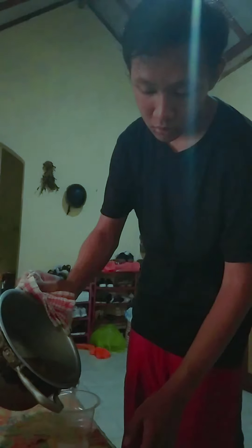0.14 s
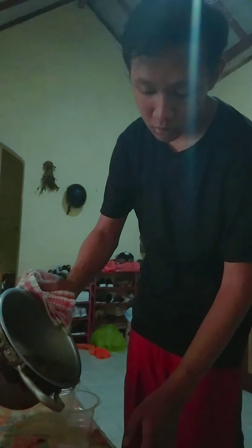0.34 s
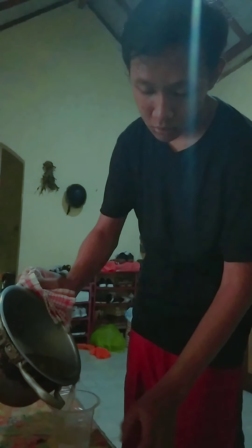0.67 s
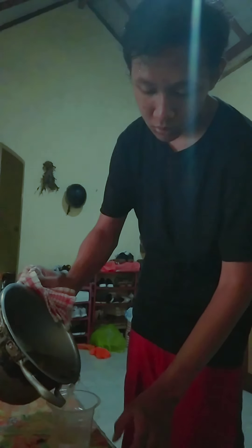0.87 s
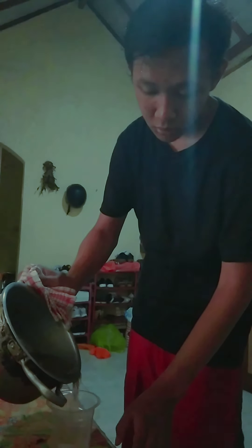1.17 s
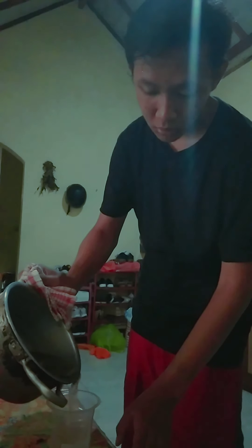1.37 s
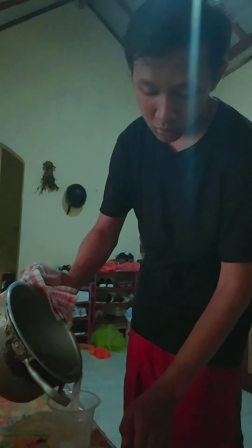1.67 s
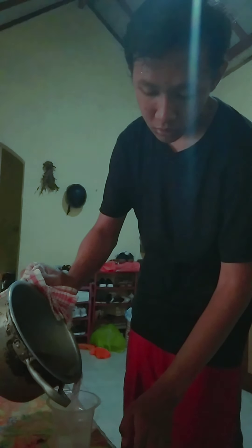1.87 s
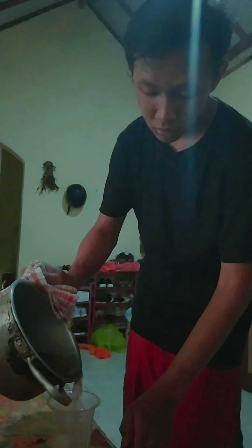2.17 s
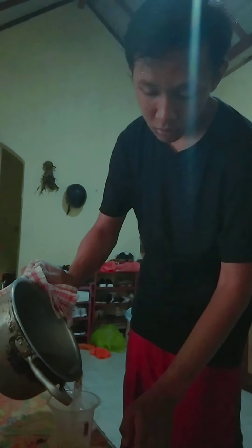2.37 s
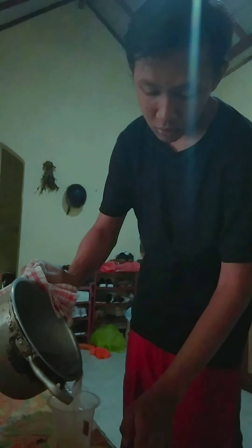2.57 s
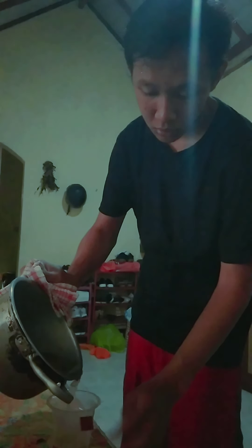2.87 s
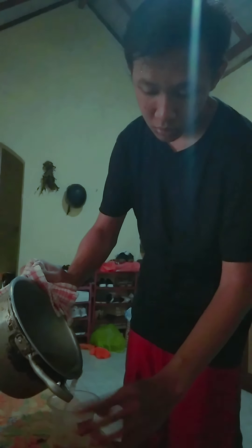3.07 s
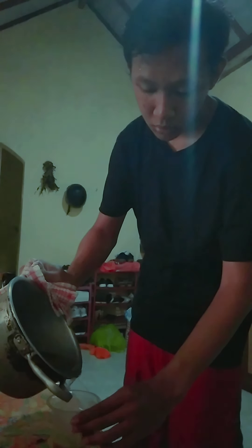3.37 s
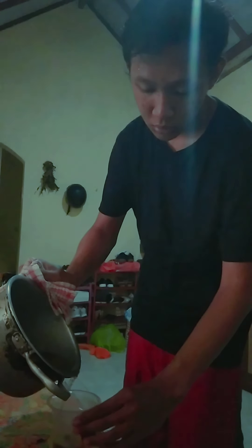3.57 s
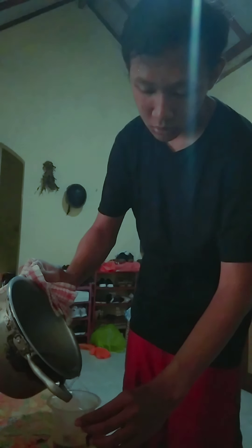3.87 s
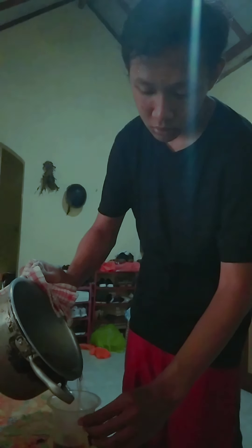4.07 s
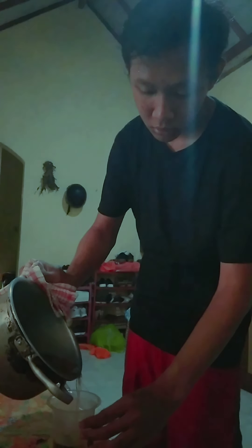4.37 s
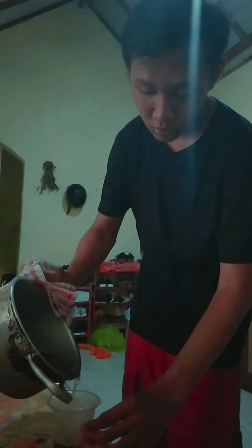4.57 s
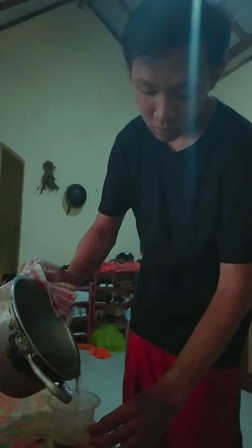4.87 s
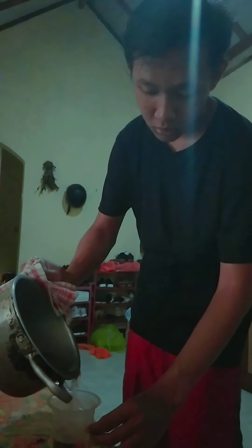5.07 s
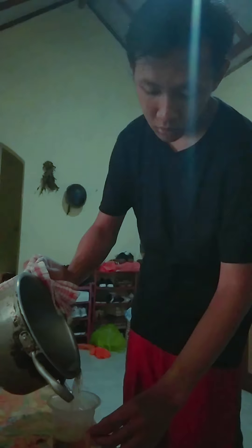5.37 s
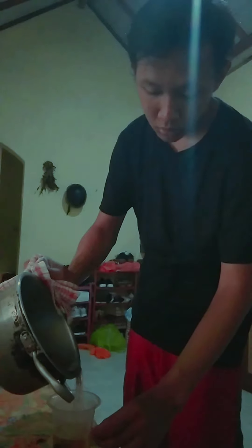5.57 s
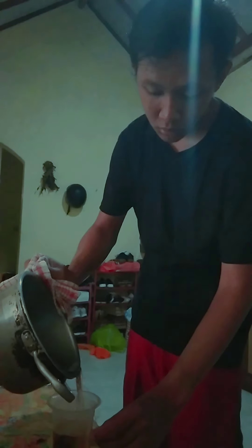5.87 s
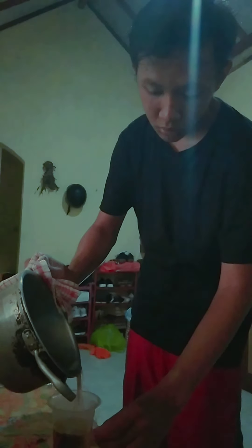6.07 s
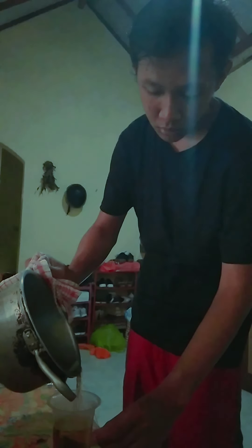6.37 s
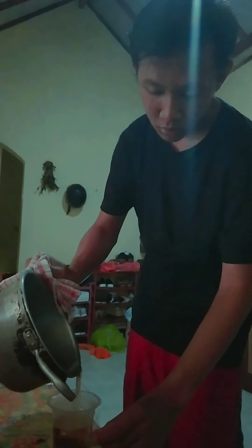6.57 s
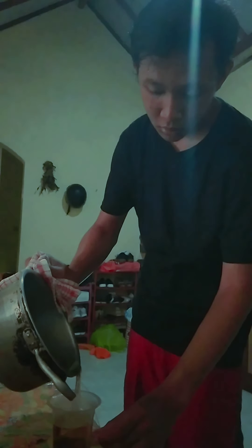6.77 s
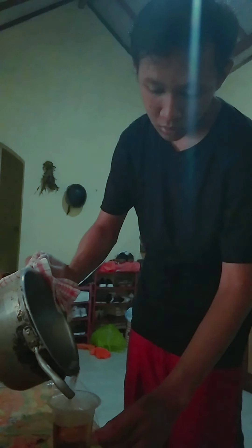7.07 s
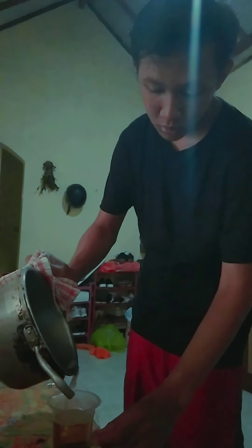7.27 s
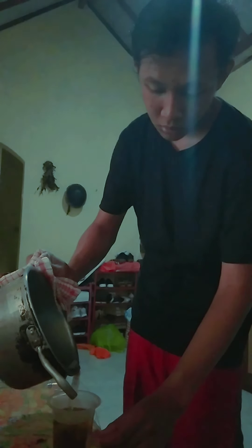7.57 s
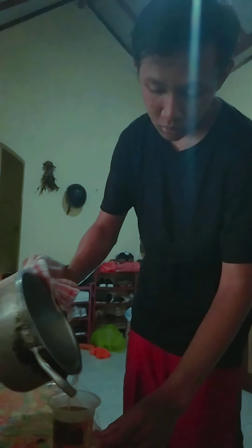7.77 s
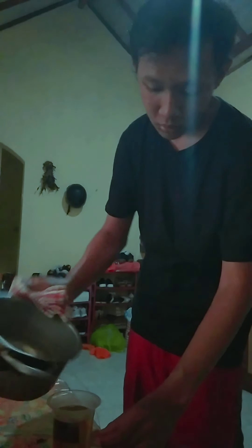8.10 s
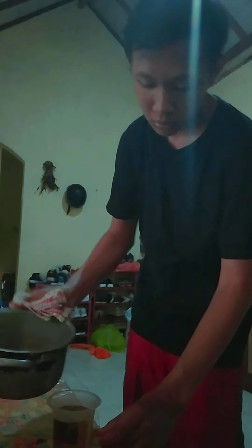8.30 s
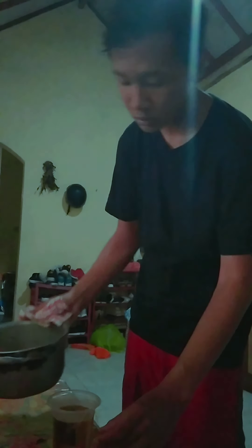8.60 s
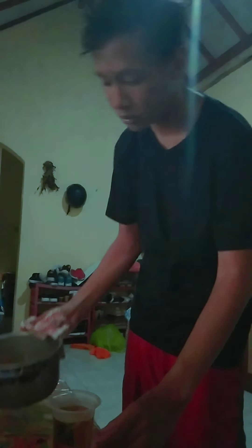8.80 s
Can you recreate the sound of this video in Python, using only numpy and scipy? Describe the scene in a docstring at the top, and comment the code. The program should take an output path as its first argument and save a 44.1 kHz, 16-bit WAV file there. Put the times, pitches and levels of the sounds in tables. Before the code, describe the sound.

Close to the microphone, a fizzy, splashing stream hits a plastic cup with a few hard cracks and hollow gurgles. It quickly thins to irregular drips, wet slithers and round bubble plops, with one big clean gulp around the middle. Dull table bumps, short room reflections and faint hush surround it; a motorbike drones low outside late on, and the pan's handle ticks as the pouring ends.

```python
"""Hot water with small pieces in it spatters into a plastic cup, then thins to dribbles, drops and plops.
It is poured from a steel saucepan in a hard-walled kitchen; dull bumps, faint hush and a motorbike lie behind.
Spray, splash and impacts are coloured noise; bubbles are damped sines around the pitch of the cup's hollow,
which climbs as the cup fills and sinks towards the end. The left channel is muffled in the treble."""
import sys
import numpy as np
from scipy import signal
from scipy.fft import rfft, irfft, next_fast_len
from scipy.io import wavfile
from scipy.ndimage import uniform_filter1d

SR = 44100
rng = np.random.default_rng(int(sys.argv[2]) if len(sys.argv) > 2 else 0)


def inscribe(sig):
    """Save sig as 16-bit PCM at rate SR to the path in sys.argv[1].

    A 1-D sig is mono; a 2-D sig holds one channel per row.
    Samples are clipped to [-1, 1] before scaling.
    """
    pcm = np.round(np.clip(np.atleast_2d(sig).T, -1, 1) * 32767)
    wavfile.write(sys.argv[1], SR, pcm.astype(np.int16))


N = 394254

# unbroken stream, full and then a trickle: [t/s, level/dB]
FLOW_DB = [(0, -105), (.3, -91), (.37, -59), (1.3, -51), (1.8, -57.5), (2.05, -73), (2.9, -72.5),
           (3.3, -71.5), (3.9, -92), (4.65, -82), (5.1, -74), (5.85, -86), (6.95, -78.5), (7.3, -69.5),
           (7.85, -76.5), (8.94, -88)]
# water over the cup's bottom: [t/s, depth/0-1]
DEPTH = [(1.5, 0.46), (2.3, 0.94)]
# air above the water in the cup: [t/s, f/Hz]
HOLLOW_HZ = [(0, 750), (.9, 790), (1.55, 843), (1.9, 924), (2.7, 923), (4.4, 1025), (5.5, 1045), (7.2, 963),
             (8.9, 848)]
# colour of water splashing: [f/Hz, level/dB]
SPLASH = [(150, -20), (500, -17.5), (800, -1), (1150, -5), (1500, -4.5), (2000, -1), (3000, 3),
          (4500, -9.5), (7000, -11.5), (14000, -43.5)]
DROP_HZ = 8090  # middling drop


def amp(db):
    """Amplitude factor of a level in dB."""
    return 10 ** (np.asarray(db) / 20)


def unit(x):
    """x at rms 1."""
    return x / np.sqrt(np.mean(x ** 2) + 1e-20)


def along(points, hz):
    """(f/Hz, value) points interpolated on a log frequency axis."""
    f, v = np.transpose(points)
    return np.interp(np.log(hz + 1), np.log(f + 1), v)


def curves(rows):
    """One value per sample for each column after the time."""
    s, *cols = np.transpose(rows)
    return [np.interp(np.arange(N) / SR, s, c) for c in cols]


def filtered(x, response):
    """x times a response of frequency."""
    n = x.shape[-1]
    m = next_fast_len(n + SR // 4)
    return irfft(rfft(x, m) * response(np.fft.rfftfreq(m, 1 / SR)), m)[..., :n]


def coloured(x, spectrum, size=4096):
    """x through a causal, minimum-phase filter of (f/Hz, level/dB) shape."""
    cepstrum = irfft(np.log(amp(along(spectrum, np.fft.rfftfreq(size, 1 / SR)))))
    # fold the cepstrum onto positive time
    cepstrum[1:size // 2] *= 2
    cepstrum[size // 2 + 1:] = 0
    impulse = irfft(np.exp(rfft(cepstrum)))
    return signal.fftconvolve(x, impulse)[:len(x)]


def add(track, s, sound):
    """Mix a sound into the track at time s."""
    part = track[max(0, round(s * SR)):][:len(sound)]
    part += sound[:len(part)]


def peaked(x, db):
    """x with its peak at db."""
    return amp(db) * x / np.abs(x).max()


def steady(x, span):
    """x levelled to about rms 1 over stretches of span seconds."""
    power = np.abs(uniform_filter1d(x ** 2, int(span * SR) + 1))
    return x / np.sqrt(power + 0.013 * np.mean(x ** 2))


def humps(rows, half):
    """A smooth rise and fall around each (t/s, level/dB) row."""
    t = np.arange(N) / SR
    return sum(amp(db) * np.exp(-((t - s) / half) ** 2) for s, db in rows)


def stream():
    """A full stream rushes on bare plastic; on deeper water it fizzes higher and bubbles ring in the hollow."""
    # fine rush on bare plastic, fizz on deep water: [f/Hz, level/dB]
    bare_colour = [(300, -68), (2000, -15.5), (3800, -4), (5200, -7.5), (6800, -5.5), (8200, -1.5),
                   (9500, -14), (11500, -23), (14500, -22.5)]
    fizz_colour = [(300, -38), (2000, -19.5), (3800, -18), (5500, -5), (6800, -5.5), (8300, 5),
                   (9600, -5.5), (11200, -7), (13000, -7.5), (14500, -20)]
    spray_db, splash_db, gurgle_db = -2, -8, -14
    t = np.arange(N) / SR
    depth, = curves(DEPTH)
    plunge = np.interp(t, [7.2, 7.5], [1, .3])  # the last dribble traps little air
    bubbly = (.35 + .35 * depth) * plunge

    fine_bubbles = bubbles(hz=8700, spread=0.34, cycles=0.94, size_db=9, count=7000, size=120)
    droplets = unit(patter(rate=2100, spread_db=6.0)) + bubbly * fine_bubbles
    droplets = patchy(droplets, depth_db=1.3)
    rush = unit(coloured(droplets, bare_colour))
    fizz = unit(coloured(droplets, fizz_colour))
    spray = steady((1 - depth) * rush + depth * fizz, span=.07)
    crackle = .55 * bubbles(hz=DROP_HZ, spread=.1, cycles=1.5, size_db=5, count=1100, size=120)

    froth = 1.8 * bubbles(hz=1800, spread=.3, cycles=1.3, size_db=5, count=3000)
    splatter = unit(patter(rate=2200, spread_db=5.5)) + bubbly * froth
    splash = steady(patchy(coloured(splatter, SPLASH), depth_db=1.8), span=0.14)

    rings = bubbles(hz=curves(HOLLOW_HZ)[0], spread=0.11, cycles=1.7, size_db=-0.5, count=1400)
    lap_colour = [(250, -5.5), (550, -4.5), (700, -4.5), (1000, 6.5), (1300, -5.5), (3000, -32)]
    lapping = unit(coloured(patter(rate=1500, spread_db=4.0), lap_colour))
    gurgle = steady(plunge * rings + .5 * lapping, span=0.05)

    spraying, splashing, gurgling = pouring(depth)
    water = amp(spray_db) * spraying * (spray + crackle)
    water += amp(splash_db) * splashing * splash
    water += amp(gurgle_db) * gurgling * gurgle
    return water + pan((1 - depth) * splashing * rng.standard_normal(N))


def pouring(depth):
    """Strength of spray, splash and gurgle: all follow the flow; gushes over the pan's lip add power."""
    # gushes: [t/s, length/s, spray level/dB, splash level/dB, gurgle level/dB]
    gushes = [(0.17, 0.078, -76.5, -71, -51), (0.362, 0.13, -46.5, -61, -45.5),
              (0.521, 0.15, -48, -51.5, -39.5), (0.783, 0.14, -50, -46, -43),
              (1.004, 0.23, -50.5, -42, -45), (1.458, 0.095, -48, -42, -47.5),
              (1.735, 0.076, -52, -53.5, -48.5), (1.845, 0.27, -91, -63.5, -49),
              (2.199, 0.059, -55, -61.5, -56), (2.347, 0.1, -58, -88, -50.5),
              (2.494, 0.11, -74, -62.5, -48), (2.647, 0.18, -71, -89, -45.5), (3.59, 0.015, -70, -51, -48),
              (3.657, 0.038, -58.5, -57.5, -57), (3.771, 0.044, -60.5, -65.5, -62),
              (3.889, 0.12, -74, -64.5, -55.5), (4.222, 0.075, -58.5, -58.5, -46),
              (4.262, 0.27, -73.5, -63, -47), (4.851, 0.011, -62.5, -57.5, -69),
              (5.16, 0.19, -55, -64, -57), (5.434, 0.12, -51, -72, -45), (5.647, 0.015, -49, -52.5, -88),
              (6.45, 0.064, -72.5, -60.5, -86), (7.044, 0.095, -62, -52.5, -77),
              (7.129, 0.11, -47, -45.5, -43.5), (7.99, 0.087, -75, -67, -56.5)]
    rise_s, fade_s = 0.0074, 0.029
    trickle_splash_db, splash_db_per_s = -5, 1.5  # against flow; splash gains as the cup fills
    trickle_gurgle_db, deep_gurgle_db = -3, 9.5  # against flow; gain on deep water
    t = np.arange(N) / SR
    flow_db, = curves(FLOW_DB)
    splash_flow_db = flow_db + trickle_splash_db + splash_db_per_s * t
    gurgle_flow_db = flow_db + trickle_gurgle_db + deep_gurgle_db * depth
    power = amp([flow_db, splash_flow_db, gurgle_flow_db]) ** 2
    age = t[:SR]
    for s, length, *levels_db in gushes:
        shape = np.minimum(age / rise_s, 1) * np.exp(-np.maximum(age - length, 0) / fade_s)
        for voice, db in zip(power, levels_db):
            add(voice, s, (amp(db) * shape) ** 2)
    return np.sqrt(power)


def patter(rate, spread_db):
    """Random droplet impacts, rate a second, of very uneven size."""
    hit = rng.random(N) < rate / SR
    return hit * rng.choice([-1, 1], N) * amp(spread_db * rng.standard_normal(N))


def patchy(x, depth_db):
    """The colour of a splash drifts as the stream wanders over walls and water."""
    z = signal.stft(x, nperseg=256)[2]
    blur = np.outer(np.hanning(13), np.hanning(35))  # bins, frames
    field = signal.fftconvolve(rng.standard_normal(z.shape), blur, "same")
    return signal.istft(z * amp(depth_db * unit(field)), nperseg=256)[1][:N]


def bubbles(hz, spread, cycles, size_db, count, size=700):
    """A swarm of damped rings scattered around a pitch, each swelling for some cycles; size in samples."""
    place = rng.integers(0, N, count)
    pitch, life, strength = rng.standard_normal((3, count, 1))
    turns = (hz * np.ones(N))[place, None] * np.exp(spread * pitch) * np.arange(size) / SR
    u = turns / (cycles * np.exp(0.35 * life))
    climbing = np.sin(2 * np.pi * turns * (1 + 0.0033 * turns))
    rings = amp(size_db * strength) * u * np.exp(-u) * climbing
    index = place[:, None] + np.arange(size)
    return unit(np.bincount(index.ravel(), rings.ravel(), N)[:N])


def pan(drive):
    """The steel's modes sing faintly while water and pieces run over its lip."""
    # modes: [f/Hz, level/dB]
    modes = [(651, -11), (797, 2), (937, 7), (1717, -7.5), (1798, -4.5), (2040, 1), (2385, -0.5)]
    pan_db, t60_s = -13, 0.3
    t = np.arange(SR // 2) / SR
    ring = sum(amp(db - 60 * t / t60_s) * np.sin(2 * np.pi * hz * t) for hz, db in modes)
    return amp(pan_db) * signal.fftconvolve(drive, ring / np.linalg.norm(ring))[:N]


def drops():
    """A loud drop hisses briefly, ticks and throws spray; smaller drops have a higher tick and hiss."""
    # loudest drops that slap the cup: [t/s, level/dB, f/Hz]
    slaps = [(0.306, -39, 8100), (0.3283, -29, 8030), (0.3606, -28.5, 4380), (0.463, -36, 7960),
             (0.4812, -26.5, 7600), (0.618, -25, 7600), (0.7517, -35, 8760), (0.772, -30.5, 8640),
             (0.79, -46, 6450), (0.832, -45, 8030), (1.005, -31.5, 7760), (1.0185, -38, 7740),
             (1.039, -29, 8280), (1.0835, -28.5, 8000), (1.1399, -26, 7940), (1.301, -39, 8860),
             (1.313, -43, 8300), (1.4715, -37, 8700), (1.631, -33.5, 8650), (1.7472, -38.5, 7690),
             (1.836, -38, 9300), (1.9682, -34.5, 6500), (2.2138, -37.5, 8800), (2.403, -34, 8050),
             (2.725, -37.5, 8160), (3.0115, -40.5, 6950), (3.1945, -37.5, 7800), (3.8018, -36, 7700),
             (4.1684, -33, 8300), (4.1754, -33.5, 7950), (4.2115, -27.5, 8700), (4.267, -30, 8460),
             (4.8362, -37, 8550), (5.1527, -33.5, 8850), (5.172, -32, 8750), (5.222, -34.5, 8800),
             (5.2428, -23.5, 8300), (5.2612, -30.5, 8000), (5.417, -42, 8350), (5.431, -39, 7040),
             (5.445, -28, 8400), (5.535, -26.5, 8950), (5.658, -30, 9100), (6.28, -46.5, 12600),
             (6.4718, -36.5, 8600), (6.475, -39, 12400), (6.4824, -37, 7900), (6.6928, -45, 11000),
             (7.015, -40.5, 7560), (7.1176, -27.5, 8500), (7.324, -37, 7400), (7.9846, -39, 7260),
             (8.0238, -38.5, 8360)]
    # spray of a middling drop: [f/Hz, level/dB]
    slap_colour = [(500, -33.5), (3500, -32), (5200, -10.5), (6800, 0), (8300, 9), (10000, -1), (11500, -9),
                   (14500, -19.5)]
    # mist thrown up from deep water: [f/Hz, level/dB]
    mist_colour = [(6000, -51.5), (10000, -19), (12500, 2.5), (14500, -1)]
    mist_db, mist_fade_s = -19.5, .016
    body_db_full, body_per_flow, full_flow_db = -16, .42, -54.5  # heavier splash in a fuller stream
    tick_db, tick_grows, middling_db = -1, 0.12, -33.5  # louder drops tick disproportionately harder
    out, t = np.zeros(N), np.arange(SR // 8) / SR
    touch = np.exp(-t[SR // 100::-1] / 0.0025)  # rises until the burst
    flow_db, depth = curves(FLOW_DB)[0], curves(DEPTH)[0]
    for s, db, hz in slaps:
        place = round(s * SR)
        spray, splash, lead, mist = rng.standard_normal((4, len(t)))
        colour = np.array(slap_colour) * [np.sqrt(hz / DROP_HZ), 1]
        hiss = coloured(lead[:len(touch)] * touch, colour)
        tick = (t / .00015) ** 2 * np.exp(-t / 0.00012) * np.sin(2 * np.pi * hz * t)
        slap = coloured(spray * (np.exp(-t / 0.0007) + 0.14 * np.exp(-t / 0.031)), colour)
        body = coloured(splash * np.exp(-t / 0.0084), SPLASH)
        body_db = body_db_full + body_per_flow * (flow_db[place] - full_flow_db)
        veil = coloured(mist * np.exp(-t / mist_fade_s), mist_colour)
        add(out, s - len(touch) / SR, peaked(hiss, db - 15))
        add(out, s, peaked(tick, db + tick_db + tick_grows * (db - middling_db)))
        add(out, s, peaked(slap, db - 5.5))
        add(out, s, peaked(body, db + body_db))
        add(out, s, depth[place] * peaked(veil, db + mist_db))
    return out


def plops():
    """Single loud bubbles trapped by drops and pieces."""
    # bubbles: [t/s, level/dB, f/Hz]
    trapped = [(0.185, -45.5, 697), (0.39, -39, 720), (0.57, -37, 694), (0.862, -36.5, 770),
               (0.875, -35.5, 660), (1.827, -42.5, 940), (1.868, -40.5, 940), (1.997, -49, 966),
               (2.056, -42.5, 955), (2.106, -46.5, 960), (2.518, -38, 970), (2.653, -29, 966),
               (2.674, -39, 990), (2.701, -50, 1050), (2.746, -42.5, 1120), (3.497, -45, 1010),
               (3.597, -48, 984), (3.613, -45.5, 1010), (3.673, -48, 1070), (3.801, -46.5, 1065),
               (3.934, -37, 970), (3.996, -53, 1000), (4.201, -47.5, 1110), (4.328, -34.5, 1010),
               (4.346, -40, 965), (4.399, -37, 2650), (4.41, -37.5, 910), (4.471, -43, 905),
               (4.502, -44, 830), (4.549, -45.5, 924), (4.866, -50, 1510), (5.043, -52.5, 1120),
               (5.234, -42, 2290), (5.481, -37, 930), (5.542, -42, 1000), (5.564, -36, 1360),
               (6.11, -64, 1210), (6.46, -50.5, 1390), (6.496, -52, 1810), (6.889, -46.5, 1870),
               (7.054, -54, 1350), (7.103, -39.5, 1120), (7.118, -34.5, 2630), (7.136, -34.5, 1094),
               (7.137, -34, 1690), (7.533, -50.5, 2500), (7.565, -53, 2330), (7.683, -43, 2870),
               (7.696, -48.5, 2550), (8.076, -53, 1650)]
    out = np.zeros(N)
    for s, db, hz in trapped:
        add(out, s, plop(hz, db, rise=0.4))
    return out


def strays(count=100):
    """Lesser bubbles chirp at random in the trickle, around the hollow's pitch and above."""
    # near the brim only small ones form: [t/s, pitch/hollow's pitch]
    pitch_ratio = [(4.5, 0.9), (6.3, 1.4), (7.3, 2.6)]
    stray_db, scatter = 12, 0.14  # level over the flow, spread of log pitch
    out = np.zeros(N)
    flow_db = curves(FLOW_DB)[0]
    centre_hz = curves(HOLLOW_HZ)[0] * curves(pitch_ratio)[0]
    for s, pitch in zip(rng.uniform(2.8, 7.1, count), rng.standard_normal(count)):
        place = round(s * SR)
        hz = centre_hz[place] * np.exp(scatter * pitch)
        add(out, s, plop(hz, flow_db[place] + stray_db, rise=6.2))
    return out


def plop(hz, db, rise):
    """A bubble rings in the churn of the water around it, rough but centred on the same pitch."""
    churn_db, churn_tail, churn_fade_s = -7.5, .2, .02
    swell_ms, swell_cycles = 0.55, 1.3  # peak after this time plus cycles: small ones are brisker
    t = np.arange(SR // 10) / SR
    churn = rng.standard_normal(len(t)) * (np.exp(-t / 0.0015) + churn_tail * np.exp(-t / churn_fade_s))
    colour = [(hz / 3, -26), (hz, 0), (1.5 * hz, -6), (3 * hz, -28)]
    out = peaked(coloured(churn, colour), db + churn_db)
    add(out, 0, amp(db - 1.5) * bubble(hz, swell_ms + 1000 * swell_cycles / hz, rise))
    return out


def bubble(hz, swell_ms, rise):
    """A bubble's ring swells, dies and climbs in pitch as it nears the surface."""
    t = np.arange(SR // 20) / SR
    u = t * 1000 / max(swell_ms, .2)
    return u * np.exp(1 - u) * np.sin(2 * np.pi * hz * t * (1 + rise * t))


def gulps():
    """A large pocket of air pulled under by a lump rings clean, swelling and fading evenly."""
    # pockets: [t/s, level/dB, f/Hz, length/s]
    pockets = [(4.24, -45, 978, .03), (4.268, -32, 964, .009), (4.275, -27.5, 957, .019),
               (4.31, -24.5, 969, .007)]
    out, t = np.zeros(N), np.arange(SR // 20) / SR
    for s, db, hz, length in pockets:
        swell = np.sin(np.pi * np.minimum(t / length, 1))
        add(out, s, amp(db) * swell * np.sin(2 * np.pi * hz * t))
    return out


def slides():
    """Each wet lump slides off the pan into the cup in a grainy, bubbling rush that soon fades."""
    # lumps: [t/s, level/dB, fade/s]
    lumps = [(2.655, -57, 0.14), (3.184, -49, 0.11), (3.362, -55.5, 0.11), (3.594, -58, 0.17),
             (4.856, -79, 0.015), (5.233, -48, 0.019), (5.461, -53.5, 0.13), (6.469, -86, 0.066),
             (7.135, -44, 0.077)]
    # colour of the grit: [f/Hz, level/dB]
    slush = [(120, -7), (300, 10.5), (600, 2.5), (1100, -4), (1800, -1.5), (3000, -5.5), (5500, -5.5),
             (9000, -3), (14000, -46)]
    push, t = np.zeros(N), np.arange(SR // 3) / SR
    for s, db, fade in lumps:
        add(push, s, amp(db - 7.0) * (1 - np.exp(-t / 0.00077)) * np.exp(-(t / fade) ** 2))
    grit = unit(coloured(patter(rate=3200, spread_db=8.0), slush))
    pops = bubbles(hz=1200, spread=.45, cycles=1.1, size_db=4, count=2500)
    return push * steady(grit + .8 * pops, span=.07)


def pieces():
    """A hard piece cracks on the bare plastic before there is water to cushion it."""
    # impacts: [t/s, level/dB]
    impacts = [(.541, -31.5), (0.618, -29.5), (0.789, -29)]
    # colour of the cup's bottom: [f/Hz, level/dB]
    bottom = [(300, -1), (1000, 1), (2500, -1), (4000, 5), (6000, 7), (8500, -2.5), (10000, -46),
              (14000, -28)]
    fade_s = 0.0023
    out, t = np.zeros(N), np.arange(SR // 40) / SR
    for s, db in impacts:
        crack = rng.standard_normal(len(t)) * np.exp(-t / fade_s)
        add(out, s, peaked(coloured(crack, bottom), db))
    return out


def knocks():
    """Soft knocks on the cup, its wall damped by water: a short low note and a dull rattle."""
    # knocks: [t/s, level/dB, f/Hz]
    soft_hits = [(3.078, -60.5, 450), (3.193, -57.5, 400), (3.378, -55, 500), (3.419, -62.5, 560),
                 (3.779, -59.5, 507), (5.323, -61.5, 480), (6.729, -47, 393)]
    colour = [(120, -7.0), (300, 9), (700, 3.0), (1500, -2.0), (3000, -31.5), (9000, -38.0)]
    out, t = np.zeros(N), np.arange(SR // 10) / SR
    for s, db, hz in soft_hits:
        note = bubble(hz, swell_ms=1.5, rise=0)
        rattle = coloured(rng.standard_normal(len(t)) * np.exp(-t / 0.014), colour)
        add(out, s, amp(db + 3) * note)
        add(out, s, peaked(rattle, db + 10.0))
    return out


def crinkles():
    """The thin wall gives way in small dry snaps in the heat and under the hand that steadies it."""
    # snaps: [t/s, level/dB]
    snaps = [(2.083, -44), (2.1218, -44.5), (2.171, -46), (3.206, -38), (3.274, -42.5), (3.3245, -43),
             (3.4934, -39.5), (3.9944, -51), (4.0815, -47.5), (4.098, -42), (4.9773, -51.5)]
    # colour of the wall: [f/Hz, level/dB]
    plastic = [(500, -30), (1500, 4.5), (2600, 0), (4000, -1), (5700, 7.5), (6500, -4), (9000, -3.5),
               (14000, -37)]
    crinkle_db, fade_s = -8.5, .007
    out, t = np.zeros(N), np.arange(SR // 10) / SR
    for s, db in snaps:
        snap = rng.standard_normal(len(t)) * np.exp(-t / fade_s)
        add(out, s, peaked(coloured(snap, plastic), db + crinkle_db))
    return out


def taps():
    """The pan's handle gives short dry steel ticks as it is righted."""
    # ticks: [t/s, level/dB]
    ticks = [(8.351, -47), (8.458, -40.5), (8.472, -56), (8.519, -41), (8.798, -57.5)]
    # colour of the handle: [f/Hz, level/dB]
    handle = [(250, -46), (700, 6), (1000, 5), (1500, -10.5), (2600, -2), (3500, -3.5), (4600, -1),
              (6000, -1.5), (8800, -2.5), (10000, -17), (14000, -48)]
    out, t = np.zeros(N), np.arange(SR // 10) / SR
    for s, db in ticks:
        scrape = rng.standard_normal(len(t)) * (np.exp(-t / 0.0032) + 0.64 * np.exp(-t / 0.037))
        add(out, s, peaked(coloured(scrape, handle), db))
    return out


def bumps():
    """The table booms softly at rest, under the drumming stream and in dull bumps."""
    # bumps: [t/s, level/dB]
    thuds = [(.627, -50), (1.58, -56.5), (2.338, -58), (3.36, -55.5), (3.662, -56.5), (3.774, -58),
             (4.392, -53), (5.509, -57.5), (7.176, -47), (8.103, -54.5), (8.427, -56), (8.848, -54.5)]
    # colour of the table: [f/Hz, level/dB]
    table = [(20, -38), (45, -19), (67, 1), (90, -8), (125, -11), (200, -25), (400, -31.5), (1000, -57)]
    drum_db, rest_db, half_s = -15.5, -72, 0.06  # drumming is against the flow
    pair = [steady(coloured(rng.standard_normal(N), table), span=0.14) for _ in range(2)]
    boom = diffuse(np.array(pair))
    return boom * (amp(rest_db) + amp(curves(FLOW_DB)[0] + drum_db) + humps(thuds, half_s))


def motorbike():
    """Uneven firings drive the exhaust's low resonance; the street smears higher notes into a murmur."""
    # engine: [t/s, firing rate/Hz]
    firing_hz = [(5.1, 27.5), (5.7, 29.5), (6.5, 29.5), (6.75, 28), (7.5, 27), (7.85, 28.5), (8.94, 24)]
    # approach and departure: [t/s, level/dB]
    distance_db = [(4.8, -81), (5.2, -70), (6.1, -76), (6.45, -61.5), (6.63, -71), (6.9, -58), (7.4, -56.5),
                   (7.72, -50.5), (8.0, -61), (8.94, -63.5)]
    # brief swells of the drone: [t/s, level/dB]
    swells = [(5.07, -63), (5.53, -57.5), (6.48, -57), (6.78, -55.5), (7.53, -55.5), (8.29, -51.5),
              (8.42, -58), (8.78, -51)]
    # beat blurs to a rumble as it leaves: [t/s, roughness/0-1]
    roughness = [(7.85, .35), (8.15, .8)]
    # exhaust resonance: [f/Hz, level/dB]
    exhaust = [(40, -56), (110, -3.5), (140, -9.5), (165, 7.5), (200, 6), (230, -14), (280, -5.5),
               (400, -40), (800, -43), (2000, -96)]
    turns = np.floor(np.cumsum(curves(firing_hz)[0]) / SR)
    rough = np.clip(curves(roughness)[0], 0, 1)
    pulses = unit(np.diff(turns, prepend=0) * amp(1.8 * rng.standard_normal(N)))
    firings = np.sqrt(1 - rough ** 2) * pulses + rough * rng.standard_normal(N)
    low = filtered(coloured(firings, exhaust), lambda hz: 1 / (1 + (hz / 260) ** 8))
    drone = steady(low, span=.11)
    murmur_colour = [(150, -27.5), (260, 8.5), (380, -2.5), (550, -8.0), (900, -6.0), (2000, -40.0)]
    murmur = unit(coloured(rng.standard_normal(N), murmur_colour))
    arrival = np.interp(np.arange(N) / SR, [4.5, 4.9], [0, 1])
    nearness = amp(curves(distance_db)[0])
    swelling = nearness + humps(swells, half=0.042)
    return arrival * amp(-1.0) * (drone * swelling + amp(-13) * murmur * nearness)


def kitchen(x, early, count=36):
    """A dense early answer, then a short diffuse tail with its random detail redrawn at regular steps."""
    # decay: [f/Hz, t60/s]
    decay = [(100, 0.11), (800, 0.23), (2500, 0.25), (8000, 0.12), (15000, 0.21)]
    out = np.zeros((2, N + SR))
    hop = N // count + 1
    for start in range(0, N, hop):
        hz, t, z = signal.stft(rng.standard_normal((2, SR // 3)), SR, nperseg=256)
        fading = z * amp(-60 * t / along(decay, hz)[:, None])
        tail = signal.istft(fading, SR, nperseg=256)[1]
        tail *= 1 + early * np.exp(-np.arange(tail.shape[1]) / SR / 0.0015)
        echo = signal.fftconvolve(x[None, start:start + hop], tail / np.linalg.norm(tail[0]), axes=1)
        out[:, start:start + echo.shape[1]] += echo
    return diffuse(out[:, :N])


def diffuse(pair):
    """Two unrelated signals become left and right, alike in the bass."""
    # diffuse sound: [f/Hz, left-right likeness/0-1]
    likeness = [(60, 0.48), (300, 0.62), (800, 0.047), (1500, 0), (4000, 0)]
    turn = lambda hz: np.arccos(np.clip(along(likeness, hz), -1, 1)) / 2
    mid, side = filtered(pair, lambda hz: np.array([np.cos(turn(hz)), np.sin(turn(hz))]))
    return np.array([mid + side, mid - side])


def hush():
    """A faint steady diffuse noise."""
    # colour of the hush: [f/Hz, level/dB]
    quiet = [(20, 0), (65, -2.5), (120, 7.5), (190, 12), (260, -5), (500, -1), (800, -17.5), (2000, -15.5),
             (5000, -16.5), (8000, -19), (14500, -15.5)]
    pair = [coloured(rng.standard_normal(N), quiet) for _ in range(2)]
    return amp(-70.5) * unit(diffuse(np.array(pair)))


def scene():
    """Cup, room and street as the two microphone ports pick them up, over the hush."""
    # channel balance: [f/Hz, left minus right/dB]
    balance_db = [(60, 4), (200, -5), (400, 2.5), (750, 2), (1300, 3), (2400, -3), (4400, -15), (8100, -37),
                  (15000, -16.5)]
    pour = stream() + slides() + gulps()
    hits = drops() + plops() + strays() + knocks() + crinkles() + pieces() + taps()
    pour_echo = amp(-1.06) * kitchen(pour, early=.5)
    hit_echo = amp(1.55) * kitchen(hits, early=3.5)
    air = pour + hits + pour_echo + hit_echo + bumps() + motorbike()
    ratio = lambda hz: amp(along(balance_db, hz))
    ports = filtered(air, lambda hz: 2 * np.array([ratio(hz), np.ones_like(hz)]) / (1 + ratio(hz)))
    return ports + hush()


def record(dry):
    """A steep low-pass at the band limit."""
    top_hz = 14500
    return filtered(dry, lambda hz: 1 / (1 + (hz / top_hz) ** 120))


dry = scene()
out = record(dry)
inscribe(out)
```